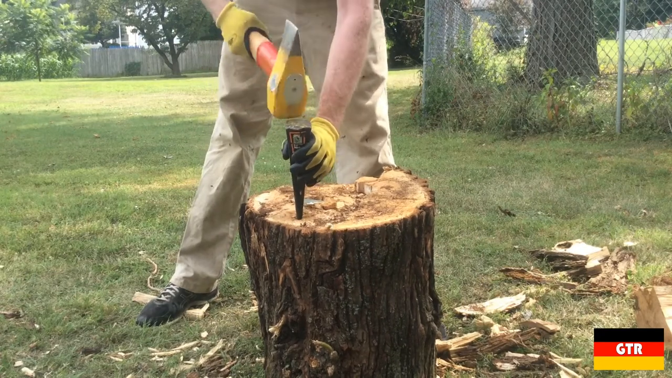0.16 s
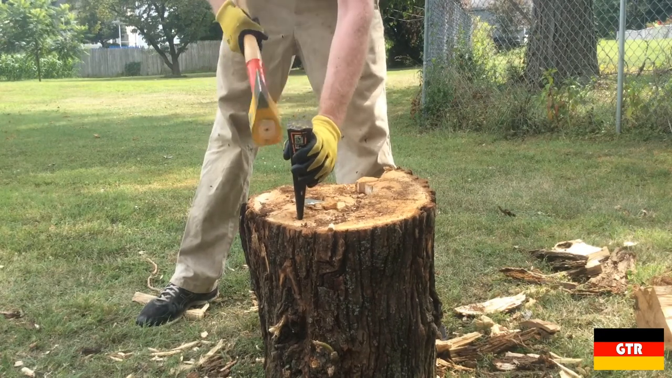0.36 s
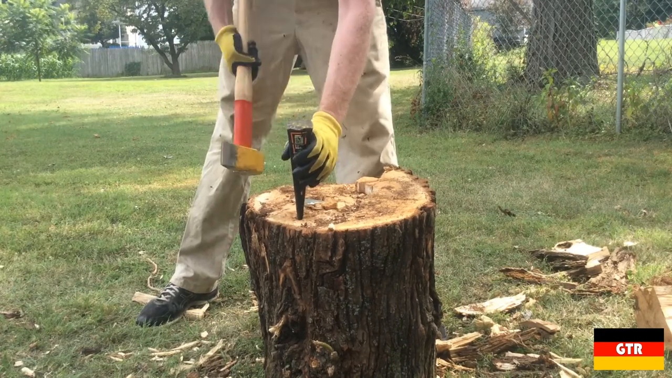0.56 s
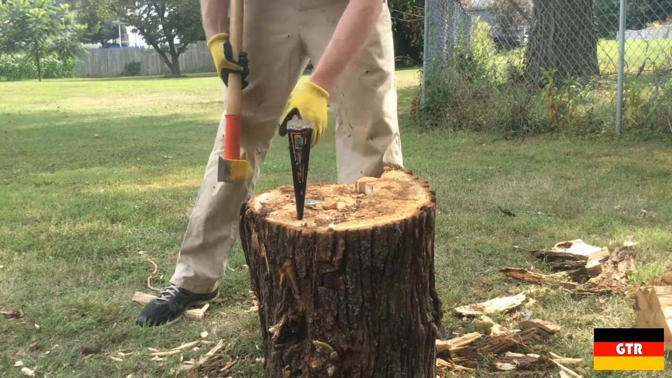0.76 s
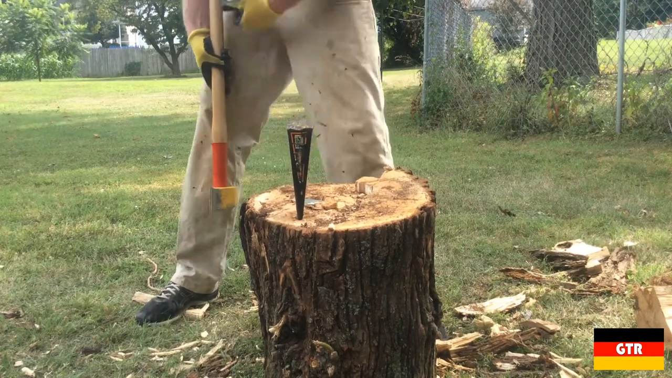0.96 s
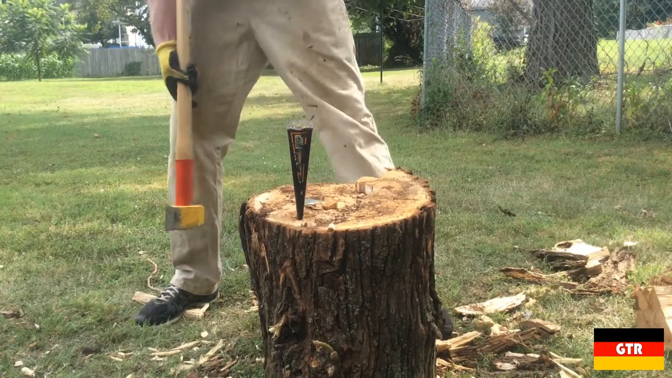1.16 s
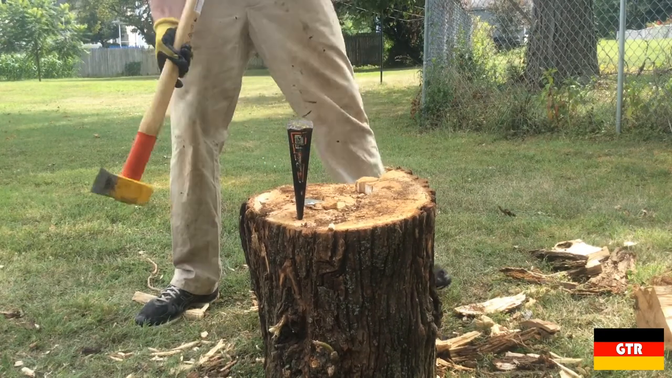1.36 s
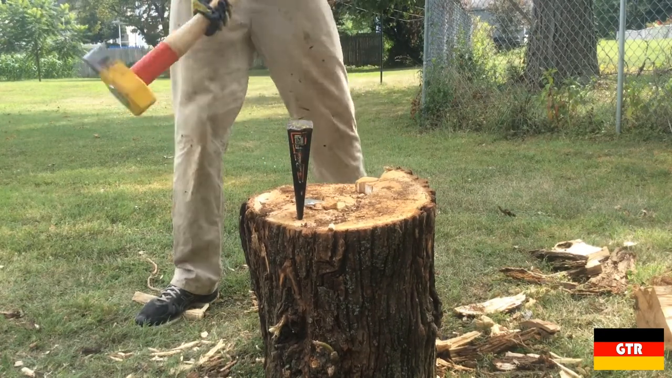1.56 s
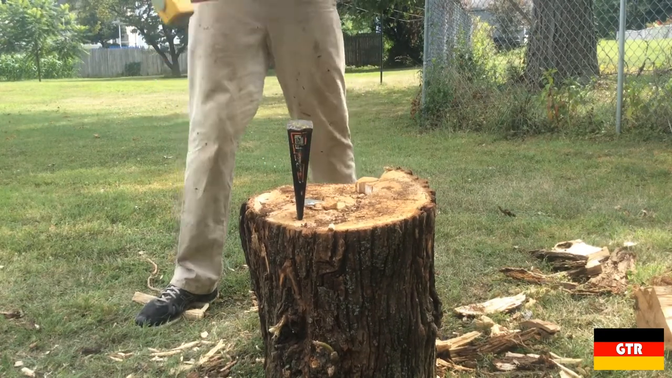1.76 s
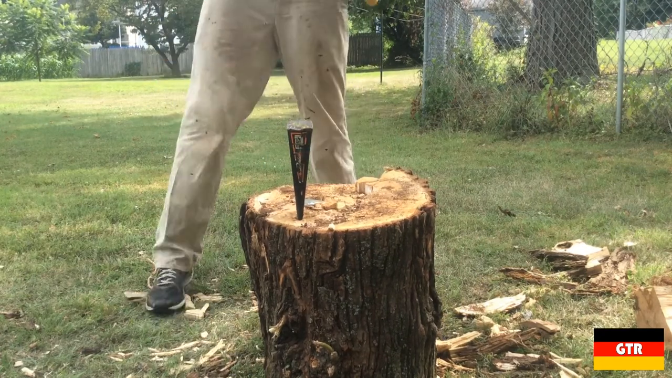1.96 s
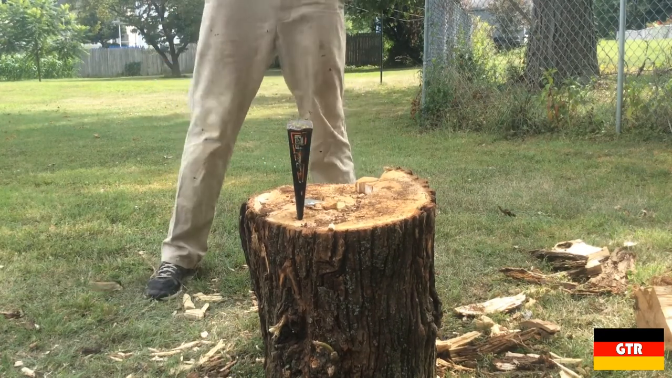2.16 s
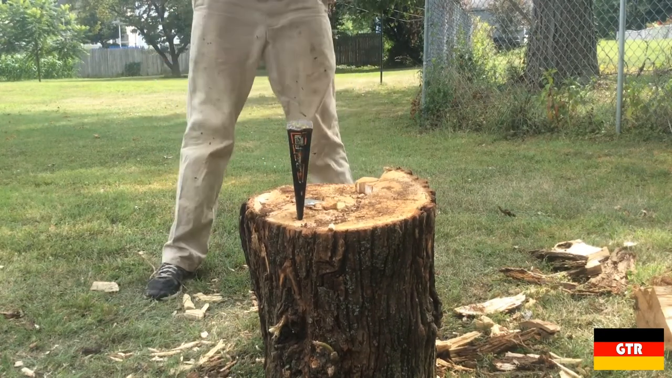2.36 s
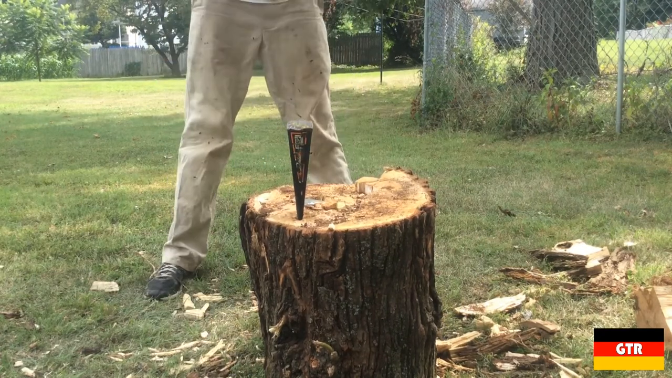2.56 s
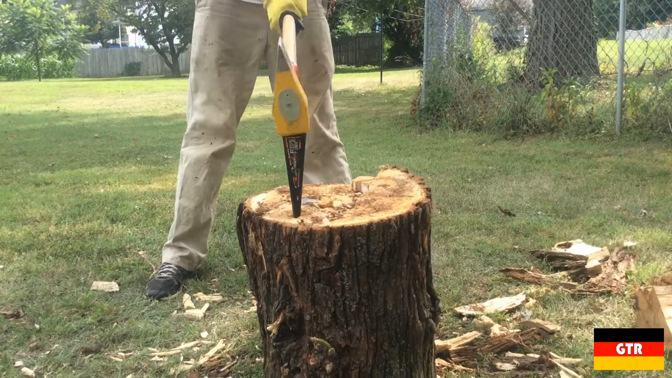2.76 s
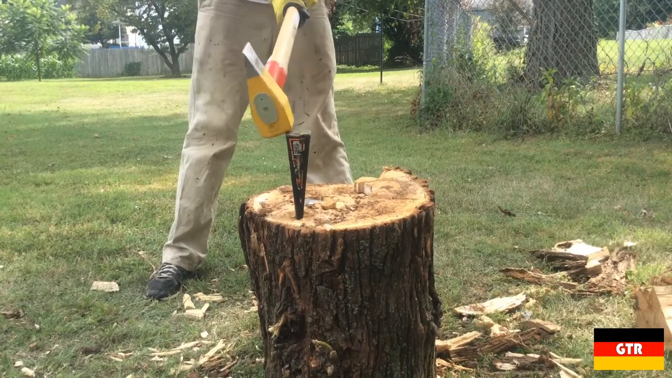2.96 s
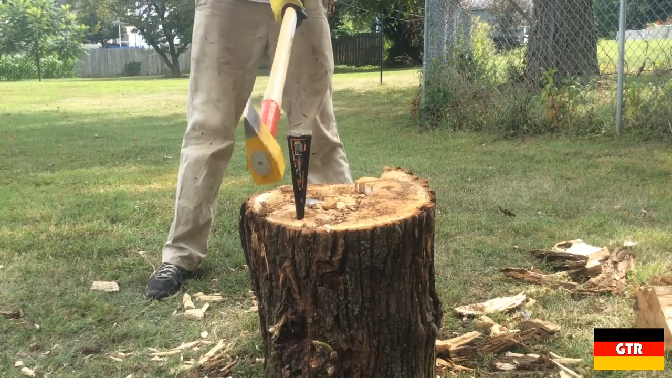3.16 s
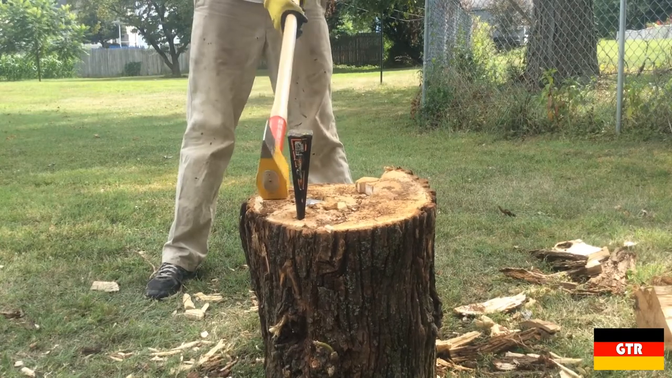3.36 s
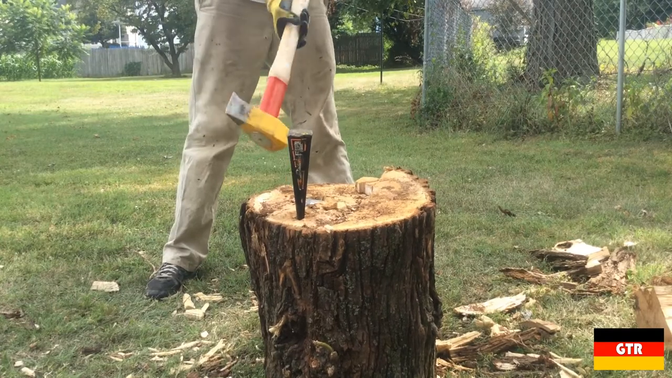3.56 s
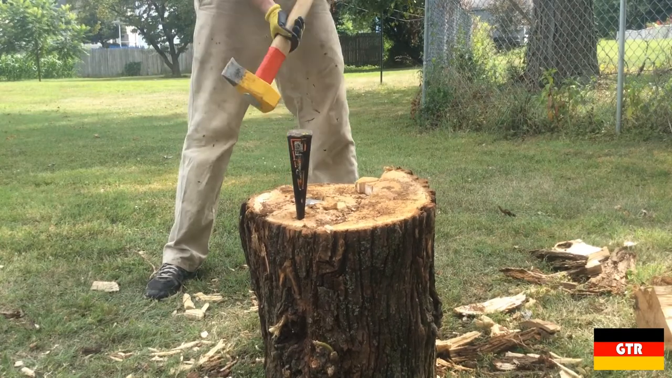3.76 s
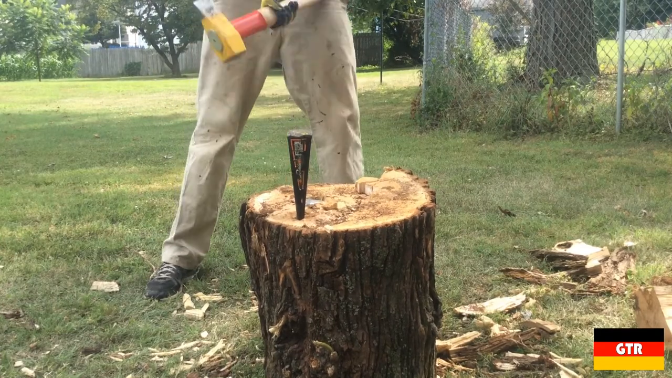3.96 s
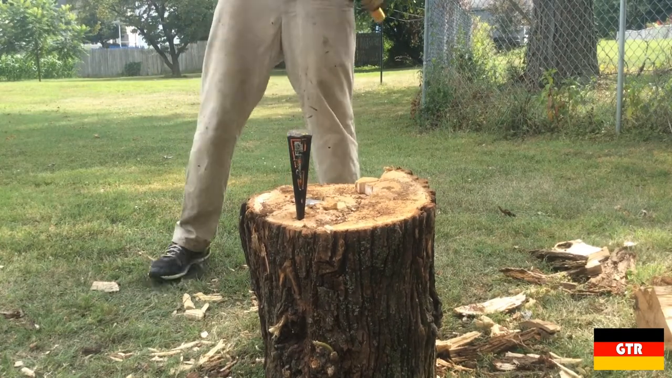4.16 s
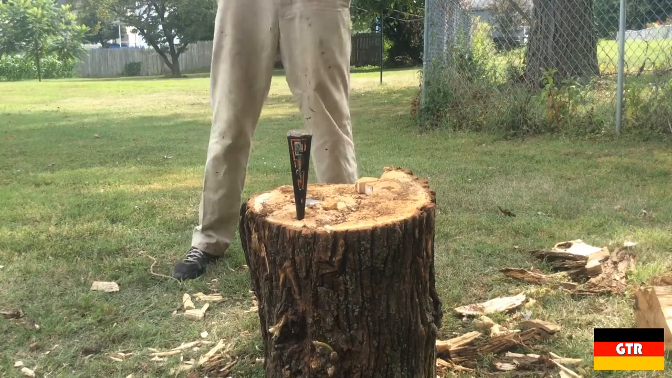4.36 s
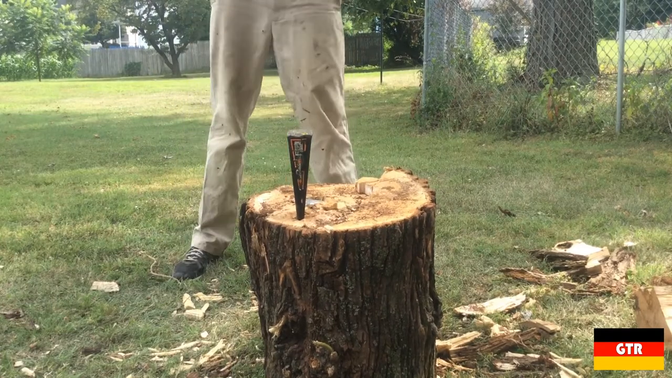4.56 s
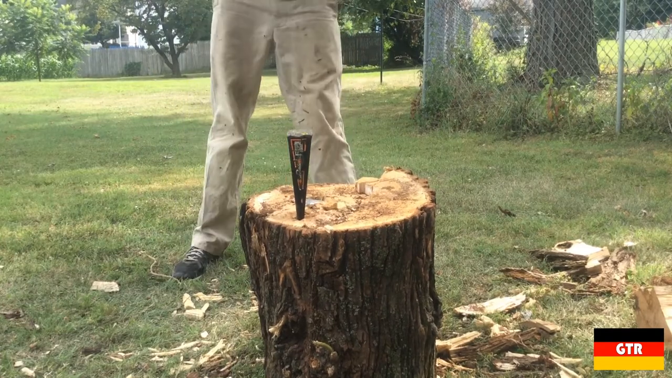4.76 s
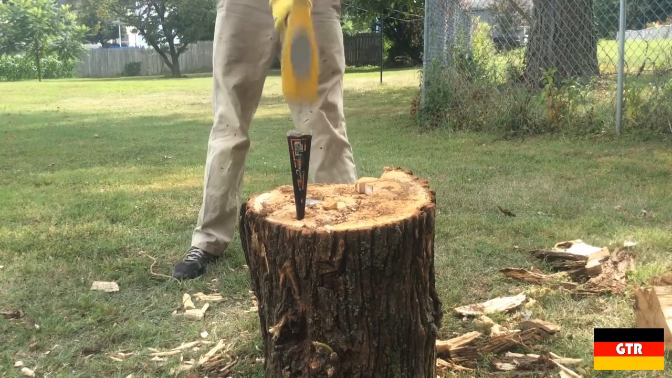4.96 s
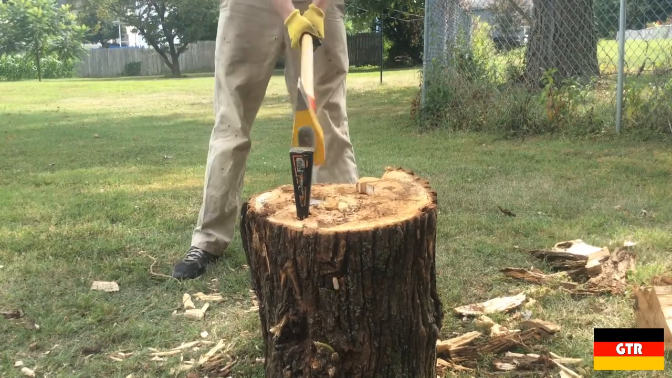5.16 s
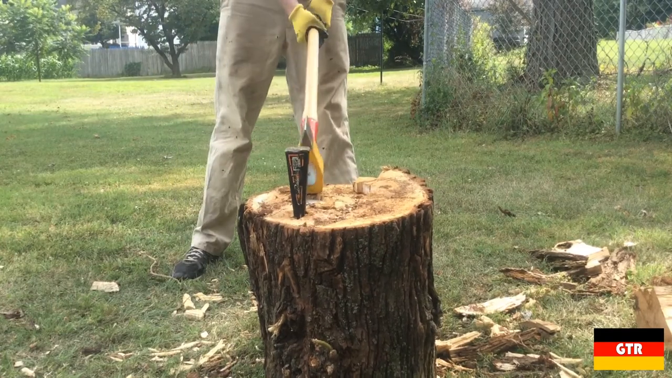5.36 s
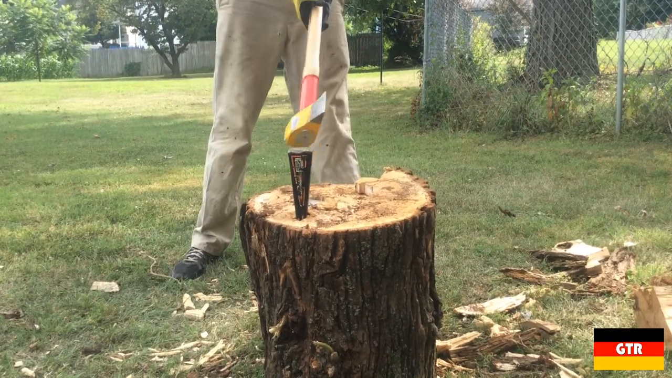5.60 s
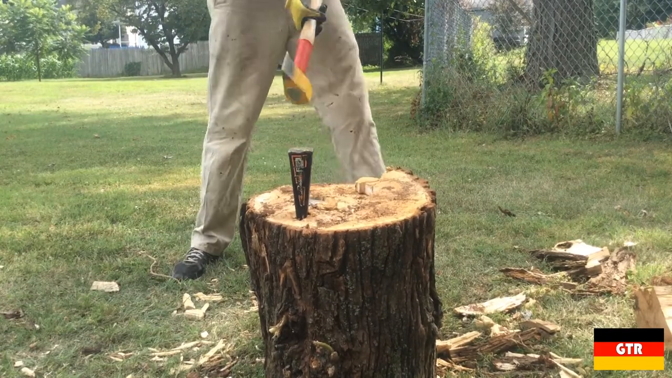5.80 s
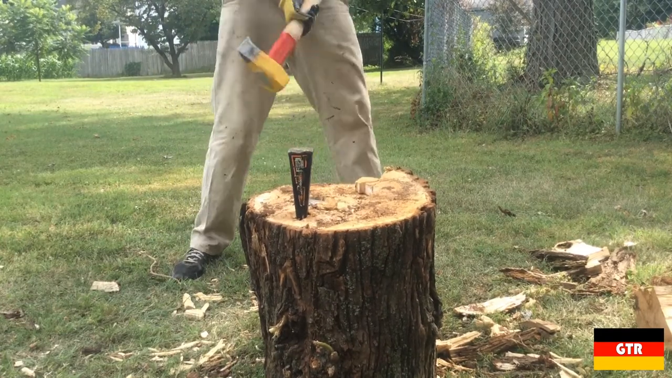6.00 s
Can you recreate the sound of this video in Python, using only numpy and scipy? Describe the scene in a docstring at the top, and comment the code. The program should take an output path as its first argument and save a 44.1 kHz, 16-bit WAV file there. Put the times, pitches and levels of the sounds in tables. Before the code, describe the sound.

Outdoors on a lawn, a maul strikes a steel wedge in a log three times, about two and a half seconds apart. Each blow is a bright, crackling clank with short ring, woody body and low ground thump. Lighter knocks on wood follow, and gloves hiss along the handle between swings. A faint motor hum and low rumble lie behind. The camera microphone is a few metres away, and the yard returns a light scattered echo.

```python
"""Splitting a log in a yard

On a lawn, a few metres from the camera microphone, a maul drives a steel wedge into a log. Each blow is
crackling noise, beating steel modes, wood modes and a low ground thump; knocks on wood are short modes and
gloves on the handle are banded hiss. Yard echoes are shaped noise; behind lie a far motor's wavering partials,
low rumble, a faint tone and a cricket's narrow hiss. The camera turns its gain down after sharp loud sounds."""
import sys
import numpy as np
from scipy import signal
from scipy.fft import rfft, irfft
from scipy.io import wavfile
from scipy.ndimage import uniform_filter1d, minimum_filter1d

SR = 44100
rng = np.random.default_rng(int(sys.argv[2]) if len(sys.argv) > 2 else 0)


def to_wav(sig):
    """Store sig (one row per channel, or 1-D mono) as 16-bit WAV at the path in sys.argv[1].

    Samples outside -1..1 are clipped; the rate is SR.
    """
    pcm = np.clip(np.atleast_2d(sig), -1, 1) * 32767
    pcm = np.round(pcm).astype(np.int16)
    wavfile.write(sys.argv[1], SR, pcm.T)  # frames by channels


N = 266099
T = np.arange(N) / SR

# Background: spectrum of the distant air and rumble: f/Hz, relative density/dB per Hz
AIR_SPECTRUM = [(15, -47.5), (30, -21.5), (60, -4), (100, -10.5), (170, -11), (300, -18), (442, -22),
                (756, -27.5), (1440, -31.5), (1830, -39), (4200, -43.5), (7020, -48), (10200, -39),
                (15300, -51.5)]
# slow course of that bed: t/s, level/dB
AIR_LEVEL = [(0, -50.5), (.5, -50.5), (1.7, -50.5), (3.5, -50.5), (4.2, -53), (6.03, -52.5)]
# far motor: t/s, first partial level/dB, second partial level/dB
MOTOR_LEVELS = [(0, -64, -49), (.6, -64, -52), (1.0, -56, -56), (1.5, -46.5, -54), (2.401, -46, -48),
                (3, -56, -53), (3.5, -43.5, -50), (4, -47.5, -53), (4.5, -47, -65), (4.9, -48, -61.5),
                (5.3, -51.5, -54), (6.03, -52, -54)]
MOTOR_HZ = 114
# cricket trills: t/s, length/s
CRICKET_TRILLS = [(2.452, 0.048), (2.698, 0.14), (3.09, 0.1), (3.25, .22), (3.919, 0.1), (4.045, 0.18),
                  (4.549, .17), (4.877, 0.14)]
CRICKET_HZ, CRICKET_DB = 10300, -69
# a faint thin tone comes and goes: t/s, length/s
WHINE_SPANS = [(.5, 0.14), (1.17, 0.34), (1.7, 0.11)]
WHINE_HZ, WHINE_DB = 1445, -69

# Yard: spectrum of the near returns: f/Hz, relative density/dB per Hz
YARD_SPECTRUM = [(200, -8.5), (600, -13.5), (2000, -4.5), (4000, -2.5), (8000, -7), (12500, -2),
                 (15500, -23.5)]
# distinct returns: delay/s, level/dB, spread/s
NEAR_RETURNS = [(.014, -5, 0.0077), (.068, -15.5, 0.014)]
# one house front answers more clearly: delay/s, level/dB, spread/s
HOUSE_RETURN = (0.346, -42.5, .04)
YARD_DB = -38  # level of all returns; the other yard levels are relative to it
SCATTER_DB, SCATTER_T60_S = -21, 1  # the diffuse wash under the distinct returns
FAR_DB, FAR_T60_S = -26.5, 0.87  # late returns from houses further off, mids only
RING_SHARE, WOOD_SHARE = .4, 0.23  # part sent to the yard; the thin ring beams upward and returns weaker

# Handle: gloves sliding: full level from t/s, hold/s, hiss level/dB, rasp against hiss/dB, rise/s, fall/s
# (the level changes by 20 dB over each rise and fall)
GLOVE_SLIDES = [(0.727, .03, -60.5, -9.5, 0.15, .05), (0.945, 0.071, -59.5, -3, .12, 0.077),
                (1.549, 0.017, -58, -2, 0.057, 0.07), (2.033, 0.05, -65.5, -8.5, 0.12, .1),
                (2.154, 0.086, -47.5, -13.5, 0.088, 0.1), (3.52, .09, -55.5, -8.5, 0.064, .1),
                (3.67, 0.0092, -41.5, -21, 0.089, 0.087), (3.725, 0.049, -52.5, -7, .1, 0.027),
                (4.24, .05, -66, -12, 0.23, .1), (4.367, 0.12, -45.5, -17, 0.072, 0.027),
                (5.6, .05, -54, -9, .08, .1), (5.69, .03, -42, -15, .1, .15), (5.77, .06, -55, -9, .1, .04)]
SLIDE_CURVE = 0.98  # 1 = straight fade in dB, more = rounder top and steeper ends
# leather catching with a tick: t/s, starting level/dB
GLOVE_CATCHES = [(0.831, -57.5), (0.921, -50), (1.352, -56), (1.538, -51), (2.319, -57), (4.488, -42)]

# Log: soft low thuds, perhaps a foot on turf: t/s, relative level/dB, f/Hz
SOFT_THUDS = [(5.64, -39, 70.6), (5.769, -34.5, 90)]
# loose wood rattling after the second blow: t/s, length/s, level/dB
WOOD_RATTLES = [(2.826, 0.079, -40), (2.892, 0.111, -39), (3.089, .065, -40.5)]
# the head's flank snaps against the bark: t/s, level/dB, t60/s
FLANK_SNAP = (3.3315, -24.5, 0.022)
# spectrum of that snap: f/Hz, relative density/dB per Hz
SNAP_SPECTRUM = [(700, -4), (1300, 2), (2300, 4), (3800, -2), (5500, -11), (9000, -13), (13000, -14),
                 (15300, -17)]
# the loose wedge pings once: level before the soft onset/dB, f/Hz
WEDGE_PING = (-22, 1227)
PING_S, PING_T60_S = 2.838, .09
# knocks on wood: t/s, relative level/dB, f/Hz, overtone level/dB, crunch level/dB
# (overtones and crunch are relative to the first mode)
WOOD_KNOCKS = [(0.239, -12, 502, -17.5, -5), (2.829, -19, 578, -7.5, -22), (2.868, -23.5, 535, -10, -2),
               (2.956, -20, 553, -15, -27), (2.976, -16.5, 503, -24, -5), (3.09, -26.5, 553, -13, -16),
               (3.128, -18.5, 772, -26, -22), (3.332, 0, 295.9, -10, -17.5), (5.182, -14, 474, -12.5, 7),
               (5.356, -6, 298, -13, -12)]
# overtones of a knock: multiple of the pitch, relative level/dB
KNOCK_OVERTONES = [(.6, 12), (.76, 9.5), (1.35, 4), (1.85, 2), (2.5, 0.5), (3.2, -0.5)]
# in cycles of the pitch: fade by 60 dB, build-up, and start ahead of the listed time
KNOCK_CYCLES, PUSH_CYCLES, LEAD_CYCLES = 24.2, 7.9, 0.856

# Main source: steel contacts, two to a blow: t/s, spot struck (0 to 2), crack level/dB, crack t60/s,
# steel ring level/dB, wood level/dB, crunch level/dB, ground thump level/dB
STEEL_CONTACTS = [(0.1618, 0, -20, 0.098, -13, -23, -14.5, -13.5),
                  (0.176, 0, -37.5, 0.022, -39, -17.5, -27, -36),
                  (2.7659, 1, -16.5, 0.077, -19, -17.5, -20.5, -21),
                  (2.776, 1, -17, 0.076, -15.5, -19.5, -27, -48),
                  (5.1013, 2, -9, 0.015, -14, -23, -16.5, -20),
                  (5.112, 2, -15.5, 0.048, -23, -16, -22.5, -20.5)]
# spectrum of steel cracking on steel: f/Hz, relative density/dB per Hz
CRACK_SPECTRUM = [(500, -0.5), (1800, -1), (4000, 1), (4800, -6.5), (6300, -6), (7500, -1.5), (8300, -4.5),
                  (10500, -13.5), (11800, -4), (13000, -7), (13800, -13), (14800, -6.5)]
# modes of wedge and head: f/Hz, t60 before the common drain/s, then relative level/dB at spots 0, 1 and 2
STEEL_MODES = [(1204, 0.74, -23, -14.5, -18), (1770, 0.3, -8, -5, -11), (2400, 0.3, -9.5, -9.5, -8),
               (3173, 0.39, -10, -25, -17.5), (3900, 0.1, -4, -12, -13), (4360, .22, -11, -32, -9.5),
               (5530, .4, -14, -11, -1), (6540, 0.45, -14.5, -9.5, -15), (7544, 0.13, -4, -2, 1),
               (8440, .17, -9.5, -47, -12), (11810, 0.13, -9, 2.5, 7.5), (12000, 0.2, -22.5, -5.5, -17.5),
               (12700, 0.33, -12, -7, -11), (13940, .07, -5.5, -21, -14.5)]
# modes of the wood under the wedge, before scatter: f/Hz, relative level/dB, t60 in a blow/s
WOOD_MODES = [(152, -11, 0.055), (348.7, -0.5, 0.059), (523, 0.5, 0.034), (780, -3, 0.082),
              (1000, -8.5, 0.11), (1272, -21.5, 0.083)]
WOBBLE = .004  # share by which the ringing pitch wanders while the wedge shifts in the wood

# Camera
HOLD_S, TOP_HZ = .27, 15350  # hold of the lowered gain, upper limit of the sound


def undb(db):
    """Amplitude factor of a level in dB."""
    return 10 ** (np.asarray(db) / 20)


def unit(x):
    """Scale to rms 1."""
    return x / np.sqrt(np.mean(x ** 2))


def band(x, lo_hz, hi_hz):
    """Keep the band between two frequencies."""
    return signal.sosfilt(signal.butter(2, [lo_hz, hi_hz], "bandpass", fs=SR, output="sos"), x)


def noise_band(size, lo_hz, hi_hz):
    """White noise passed through one band."""
    return band(rng.standard_normal(size), lo_hz, hi_hz)


def coloured(points, size):
    """Noise of rms 1 whose spectrum follows (Hz, dB) points."""
    hz, db = np.transpose(points)
    f = np.maximum(np.arange(size // 2 + 1) * SR / size, 1)
    shape = undb(np.interp(np.log(f), np.log(hz), db, -60))
    return unit(irfft(rfft(rng.standard_normal(size)) * shape, size))


def fade(t, t60):
    """Exponential decay by 60 dB in t60."""
    return np.exp(-np.log(1000) * t / t60)


def ring(t, hz, t60, phase=0):
    """A single decaying mode."""
    return fade(t, t60) * np.sin(2 * np.pi * hz * t + phase)


def bump(t, s, db, spread):
    """A bell-shaped swell around time s."""
    return undb(db) * np.exp(-((t - s) / spread) ** 2)


def gate(spans, edge=0.044):
    """Open during each (start s, length s), with straight ramps inside its ends."""
    return sum(np.clip(np.minimum(T - s, s + length - T) / edge, 0, 1) for s, length in spans)


def add(out, s, x):
    """Mix x into out from time s."""
    i = int(s * SR)
    out[i:i + len(x)] += x[:N - i]


def walk(rate):
    """Random levels held 1 / rate s and slewed twice; spread near 1."""
    k = int(SR / rate)
    steps = np.repeat(rng.standard_normal(N // k + 1), k)
    return 1.3 * uniform_filter1d(uniform_filter1d(steps, k), k)[:N]


def follow(x, s):
    """Smooth x by an exponential running mean with time constant s."""
    k = 1 / (s * SR)
    return signal.lfilter([k], [1, k - 1], x)


def crunch(t, hz, t60):
    """Fibres giving way: a short burst of low noise."""
    lo_hz, hi_hz = 0.27 * hz, 1.8 * hz
    noise = noise_band(len(t), lo_hz, hi_hz)
    return unit(band(noise, lo_hz, hi_hz)) * fade(t, t60)


def air():
    """Distant traffic, leaves and microphone hiss as shaped noise; the bass comes in lumps."""
    bed = coloured(AIR_SPECTRUM, N)
    bed = bed + band(bed, 31, 110) * (undb(2.7 * walk(10)) - 1)
    return bed * undb(np.interp(T, *np.transpose(AIR_LEVEL)) + 1.1 * walk(5))


def motor_hum():
    """A far motor: two locked partials that waver in level and slightly in pitch."""
    s, db1, db2 = np.transpose(MOTOR_LEVELS)
    turn = 2 * np.pi * np.cumsum(MOTOR_HZ * (1 + 0.0072 * walk(21))) / SR
    first = undb(np.interp(T, s, db1) + 2.1 * walk(25)) * np.sin(turn)
    second = undb(np.interp(T, s, db2) + 0.83 * walk(10)) * np.sin(2 * turn)
    return first + second


def whine():
    """A faint thin tone: one sine, gated."""
    return undb(WHINE_DB) * gate(WHINE_SPANS) * np.sin(2 * np.pi * WHINE_HZ * T)


def cricket():
    """Short trills of narrow high hiss."""
    hiss = unit(noise_band(N, CRICKET_HZ - 170, CRICKET_HZ + 170))
    return undb(CRICKET_DB) * gate(CRICKET_TRILLS) * hiss


def yard(x):
    """Scattered returns from trees, fence and houses: x convolved with shaped, fading noise."""
    t = T[:int(.65 * SR)]
    scatter = undb(SCATTER_DB) * fade(t, SCATTER_T60_S)
    level = scatter + sum(bump(t, *r) for r in NEAR_RETURNS)
    # nothing comes back before the centre of the first return
    echo = coloured(YARD_SPECTRUM, len(t)) * undb(YARD_DB) * (t > NEAR_RETURNS[0][0]) * level
    # air and leaves soak up the treble on the longer paths
    echo -= (1 - fade(t, 1.2)) * band(echo, 9500, 14000)
    far = unit(noise_band(len(t), 1500, 5000))
    far_level = undb(FAR_DB) * (1 - fade(t, 0.66)) * fade(t, FAR_T60_S) + bump(t, *HOUSE_RETURN)
    echo += undb(YARD_DB) * far * far_level
    return signal.fftconvolve(x, echo)[:N]


def gloves():
    """Leather rubbing wood: a smooth bright hiss with a darker rasp; now and then it catches."""
    bright = unit(noise_band(N, 8900, 17000) + 0.11 * noise_band(N, 4500, 14000))
    dark = unit(noise_band(N, 2300, 5500))
    out = np.zeros(N)
    for s, hold, db, rasp_db, rise, fall in GLOVE_SLIDES:
        away = np.maximum(0, np.maximum((s - T) / rise, (T - s - hold) / fall))
        out += undb(db - 20 * away ** SLIDE_CURVE) * (bright + undb(rasp_db) * dark)
    out *= undb(1.2 * walk(40))  # uneven rubbing
    t = T[:SR // 20]
    for s, db in GLOVE_CATCHES:
        add(out, s, undb(db) * unit(noise_band(len(t), 2500, 11300)) * fade(t, 0.013))
    return out


def rattle(rate=500):
    """Dense, soft, uneven taps into three wood modes; rate is taps per second."""
    taps = (rng.random(N) < rate / SR) * rng.standard_normal(N)
    t = T[:SR // 10]
    modes = sum(undb(db) * ring(t, hz, .5 * t60) for hz, db, t60 in WOOD_MODES[2:5])
    body = (1 - fade(t, 0.005)) * modes
    level = sum(undb(db) * gate([(s, length)], edge=0.018) for s, length, db in WOOD_RATTLES)
    return level * unit(signal.fftconvolve(taps, body)[:N])


def wedge_ping():
    """One soft ping near the lowest steel mode."""
    out, t = np.zeros(N), T[:SR // 5]
    db, hz = WEDGE_PING
    add(out, PING_S, undb(db) * (1 - fade(t, 0.043)) * ring(t, hz, PING_T60_S))
    return out


def flank_snap():
    """A short bright snap of noise with a weak longer tail."""
    out, t = np.zeros(N), T[:SR // 10]
    s, db, t60 = FLANK_SNAP
    decay = fade(t, t60) + 0.071 * fade(t, 0.087)
    add(out, s, undb(db) * coloured(SNAP_SPECTRUM, len(t)) * decay)
    return out


def knocks():
    """The head bounces on wood: a soft push rings a few short modes; low knocks ring longer."""
    out, t = np.zeros(N), T[:SR // 5]
    for s, db, hz, over_db, crunch_db in WOOD_KNOCKS:
        t60 = KNOCK_CYCLES / hz
        overtones = sum(undb(over_db + d) * ring(t, hz * m, 0.4 * t60) for m, d in KNOCK_OVERTONES)
        x = ring(t, hz, t60) + overtones
        x += undb(crunch_db) * crunch(t, 1.36 * hz, 0.84 * t60)
        push = (1 - fade(t, PUSH_CYCLES / hz)) ** 2
        add(out, s - LEAD_CYCLES / hz, -undb(db) * x * push)
    return out


def thumps(lead=.013, hz=62, t60=.07):
    """The ground carries a low thump just ahead of the airborne crack; soft thuds are single modes."""
    out, t = np.zeros(N), T[:SR // 4]
    for s, *_, thump_db in STEEL_CONTACTS:
        body = ring(t, hz, t60) + 1.4 * ring(t, 1.58 * hz, t60) + 0.36 * ring(t, 3.1 * hz, t60)
        add(out, s - lead, -undb(thump_db) * (1 - fade(t, 0.0068)) * body)
    for s, db, thud_hz in SOFT_THUDS:
        # the extra gain offsets the slow onset
        add(out, s, undb(db + 5.5) * (1 - fade(t, 0.019)) * ring(t, thud_hz, 0.073))
    return out


def crack(t, db, t60):
    """Steel on steel: noise with a sharp onset while the faces grind on each other, then part."""
    grit = undb(3.9 * walk(700))[:len(t)]  # the contact crackles unevenly
    pressed = fade(t ** 2, t60 ** 2 / 3)
    level = .6 * pressed + 0.15 * fade(t, t60) + 5.3 * fade(t, 0.0046)
    return undb(db) * coloured(CRACK_SPECTRUM, len(t)) * grit * level


def log_answer(t, wood_db):
    """The log's modes build up softly, their level and pitch scattered from contact to contact."""
    out = np.zeros(len(t))
    for (hz, db, t60), (a, b) in zip(WOOD_MODES, rng.standard_normal((len(WOOD_MODES), 2))):
        out += undb(wood_db + db + 1.5 * a) * (1 - fade(t, .006)) * ring(t, hz * (1 + .03 * b), t60)
    return out


def steel_ring(t, ring_db, spot):
    """Wedge and head ring: the tapered wedge splits each mode into a close pair that beats."""
    out = np.zeros(len(t))
    shaky = t + WOBBLE * np.cumsum(walk(300)[:len(t)]) / SR
    drain = fade(t, 0.06) + 0.088  # most of the ring drains fast into the wood; a weak part lingers
    for (hz, t60, *db), (a, b) in zip(STEEL_MODES, rng.standard_normal((len(STEEL_MODES), 2))):
        pair = ring(shaky, hz * (1 + .002 * a), t60) + .6 * ring(shaky, hz * (1 + .008 * b), t60)
        out += undb(ring_db + db[round(spot)]) * drain * pair
    return out


def blows():
    """Steel strikes steel: the crack with the log's answer, and apart from it the ring."""
    cracks, rings, t = np.zeros(N), np.zeros(N), T[:SR // 2]
    for s, spot, crack_db, t60, ring_db, wood_db, crunch_db, _ in STEEL_CONTACTS:
        x = crack(t, crack_db, t60) + log_answer(t, wood_db)
        add(cracks, s, x + undb(crunch_db) * crunch(t, 450., 0.12))
        add(rings, s, steel_ring(t, ring_db, spot))
    return cracks, rings


def scene():
    """Background, handle, log and blows, with the yard answering blows and wood."""
    around = air() + motor_hum() + whine() + cricket() + gloves()
    wood = rattle() + wedge_ping() + flank_snap() + knocks()
    cracks, rings = blows()
    echoes = yard(cracks + RING_SHARE * rings + WOOD_SHARE * wood)
    return (cracks + rings + wood + echoes + thumps() + around)[None]


def record(dry, top=0.023, squeeze=0.22):
    """Camera gain ducks on sharp loud sounds, holds, then lets go; peaks round off, the top is cut."""
    loud = follow(np.abs(band(dry[0], 1000, 15400)), 0.0022)
    gain = np.minimum(1, (top / (loud + 1e-9)) ** squeeze)
    size = int(HOLD_S * SR)
    held = minimum_filter1d(gain, size=size, origin=(size - 1) // 2)  # lowest gain of the past HOLD_S
    gain = follow(held - 1, 0.067) + 1  # smoothed from a start at full gain
    x = np.tanh(1.778 * dry * gain) / 1.331
    return signal.sosfilt(signal.ellip(10, .2, 60, TOP_HZ, fs=SR, output="sos"), x)


dry = scene()
out = record(dry)
to_wav(out)
```